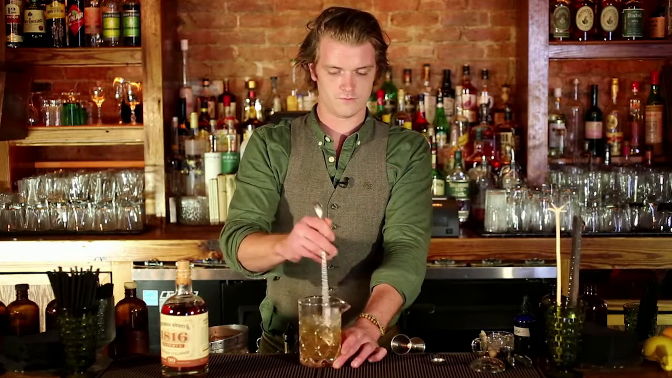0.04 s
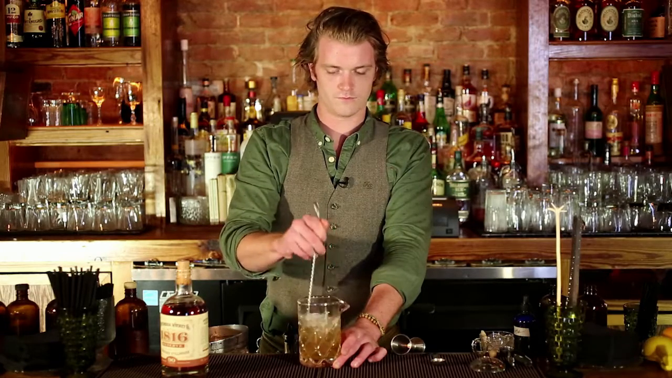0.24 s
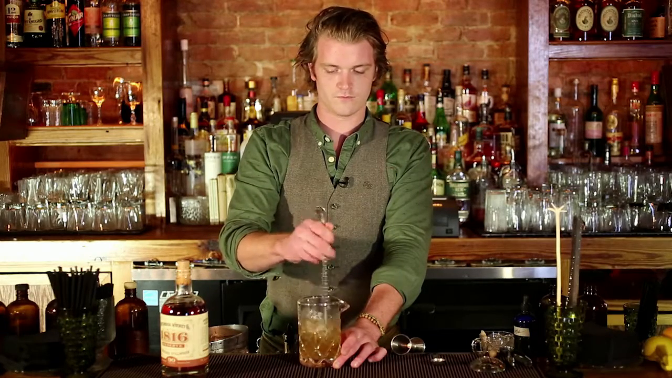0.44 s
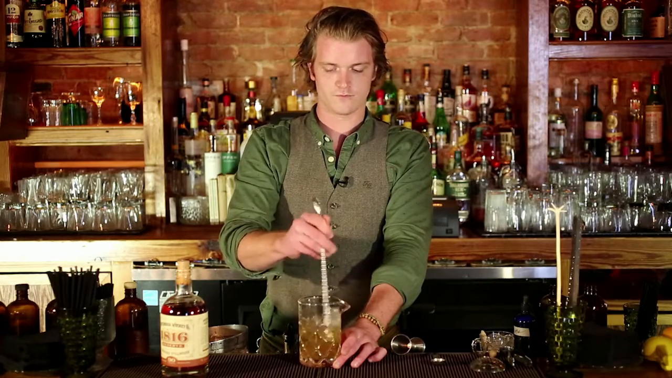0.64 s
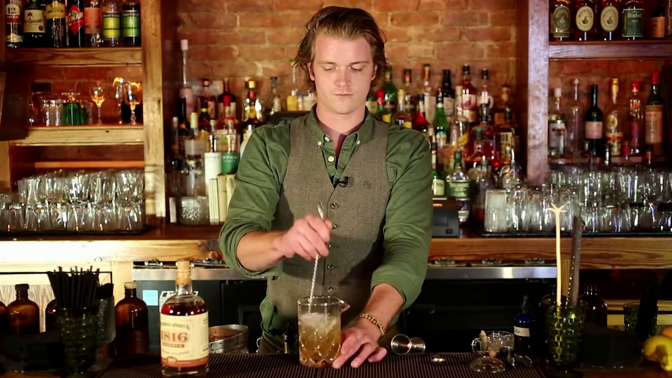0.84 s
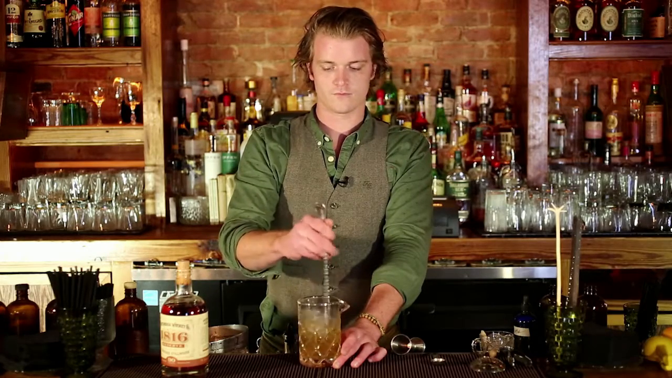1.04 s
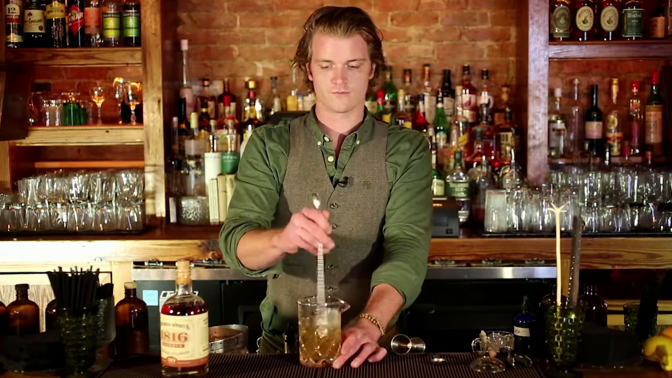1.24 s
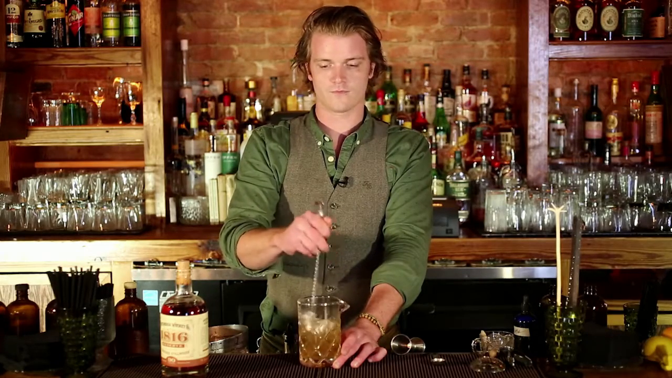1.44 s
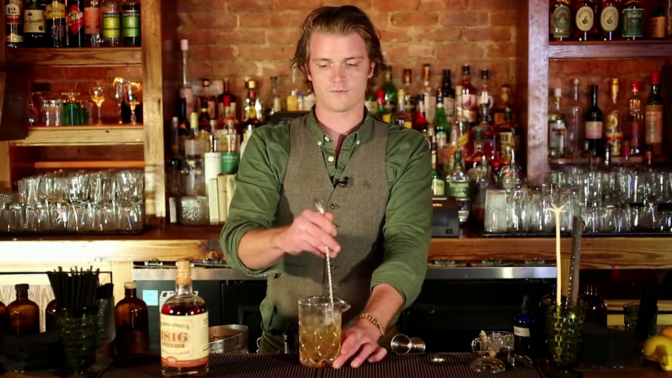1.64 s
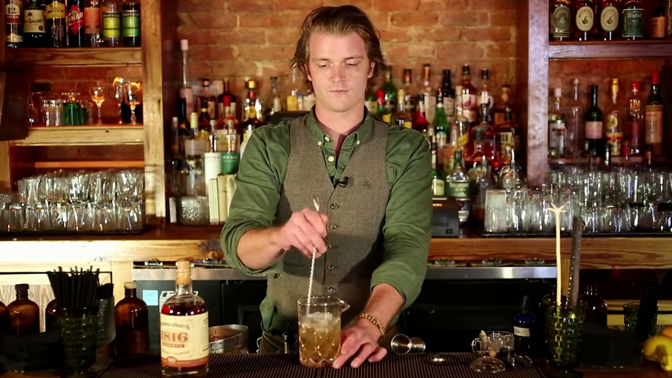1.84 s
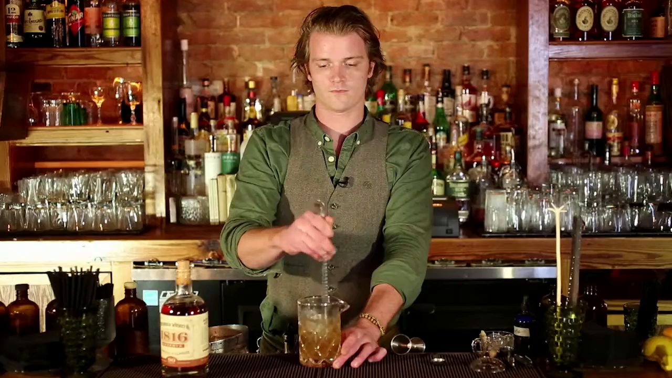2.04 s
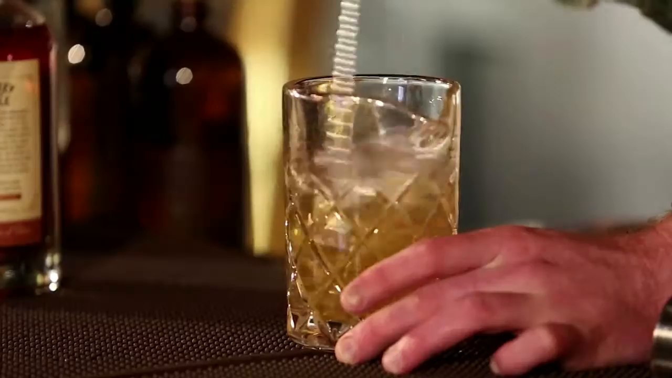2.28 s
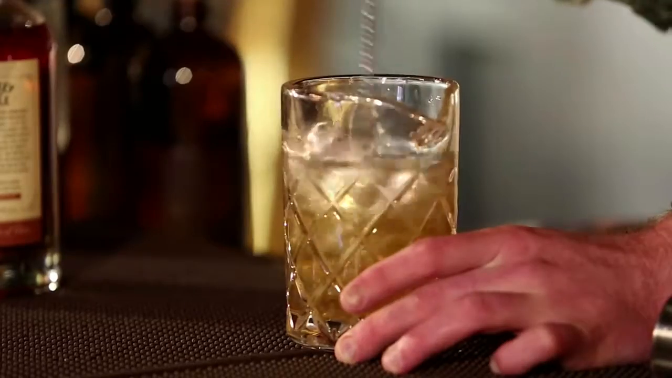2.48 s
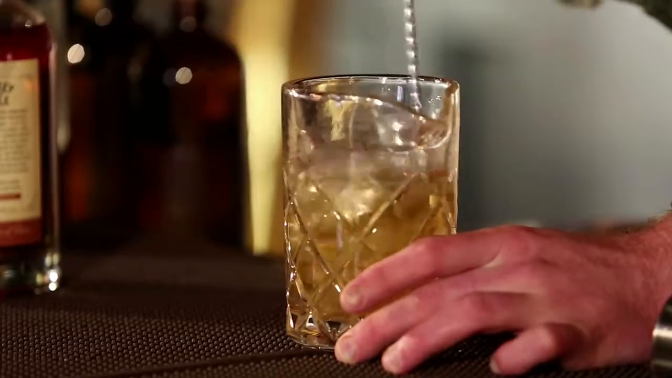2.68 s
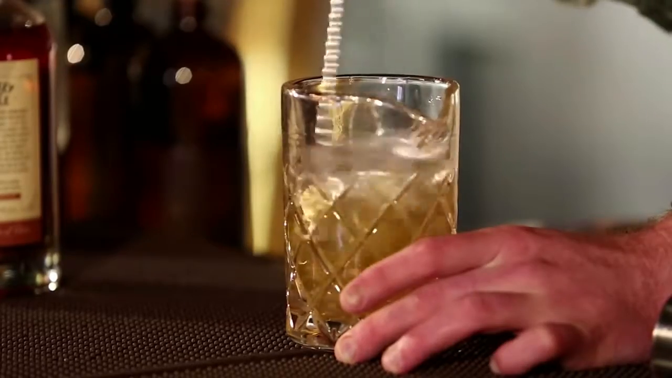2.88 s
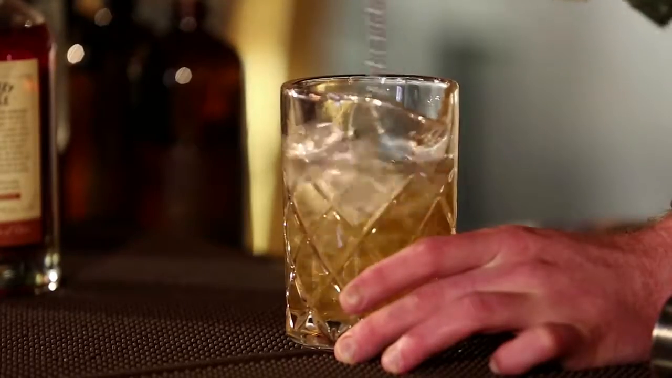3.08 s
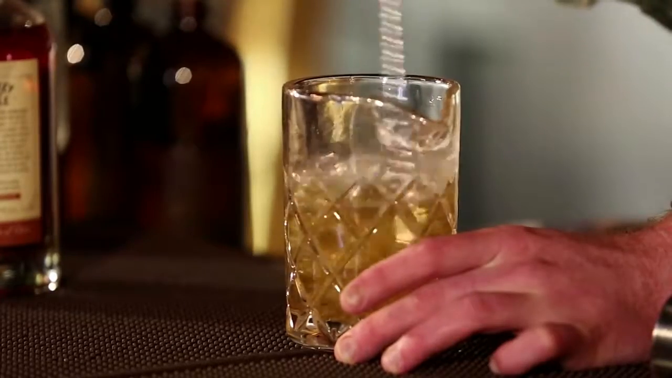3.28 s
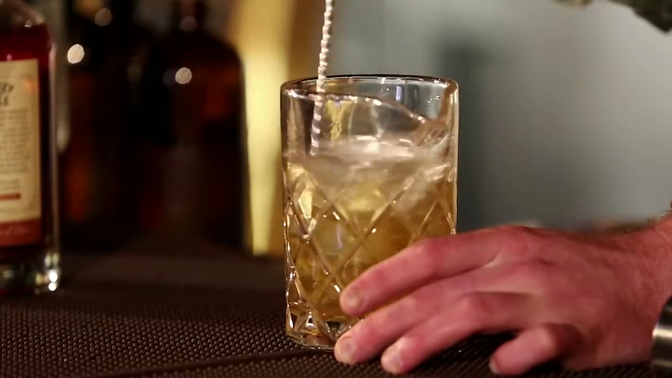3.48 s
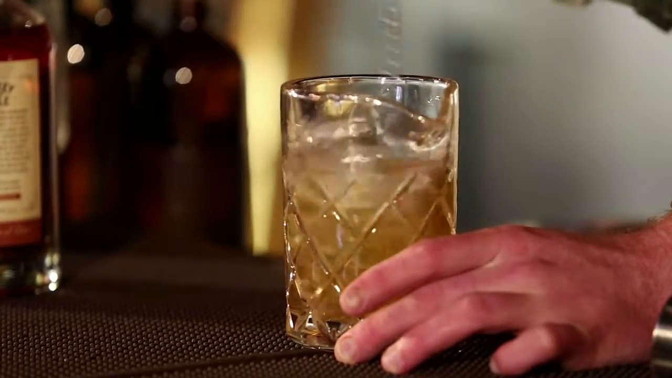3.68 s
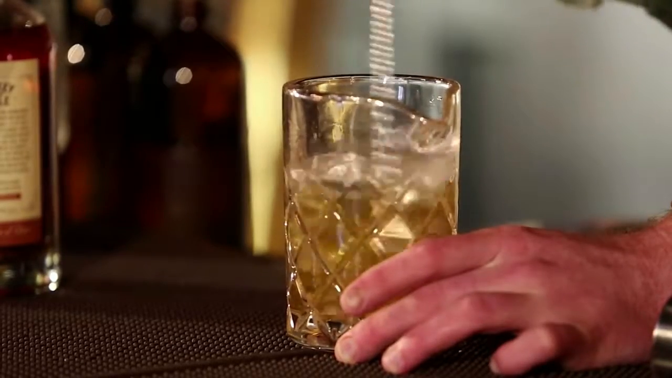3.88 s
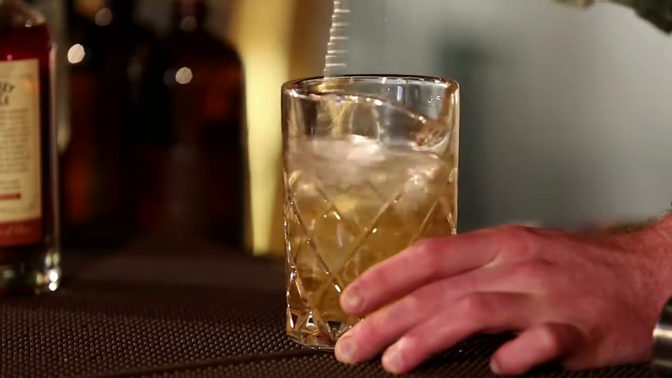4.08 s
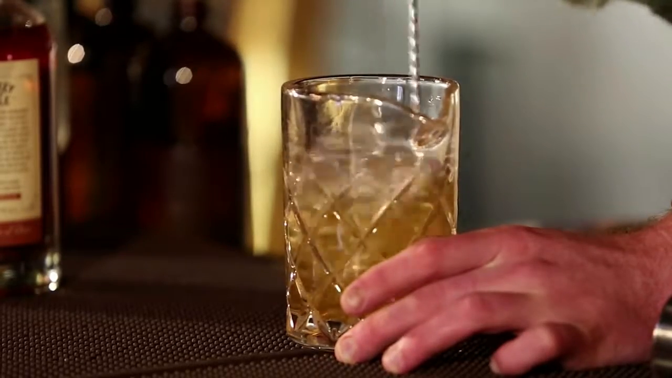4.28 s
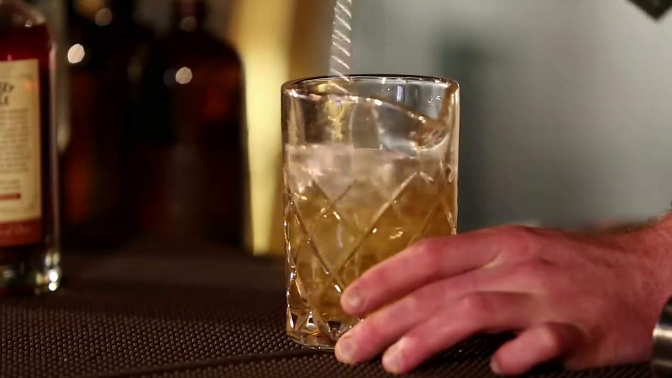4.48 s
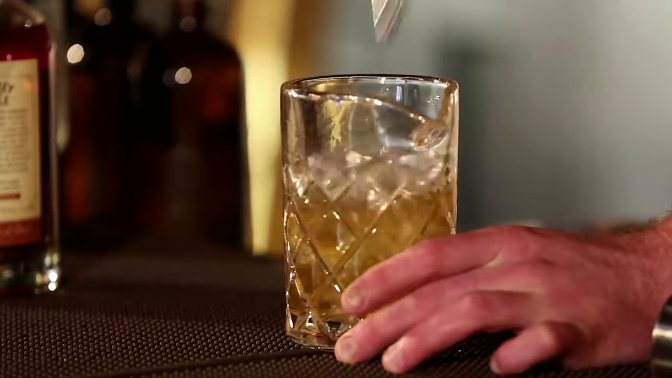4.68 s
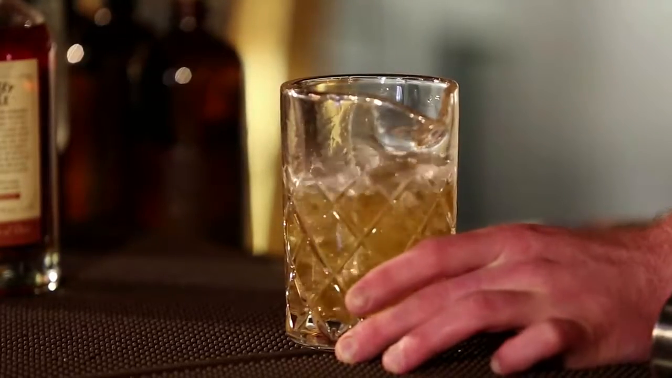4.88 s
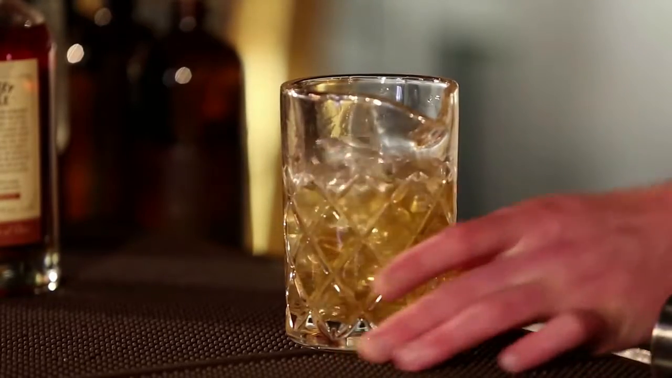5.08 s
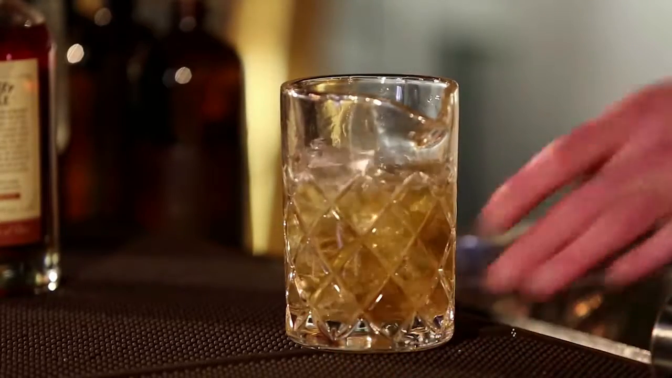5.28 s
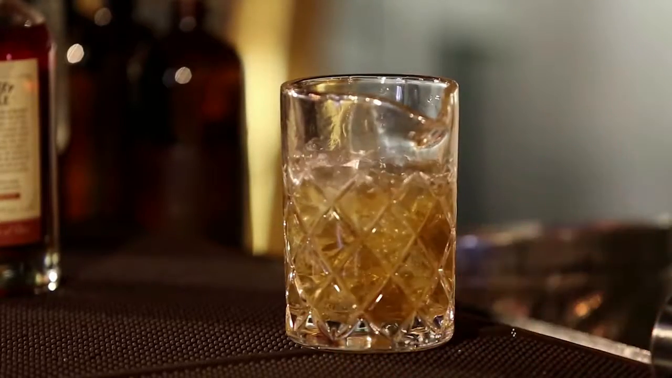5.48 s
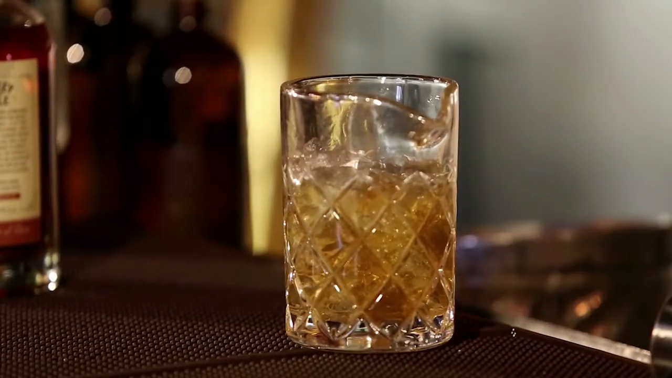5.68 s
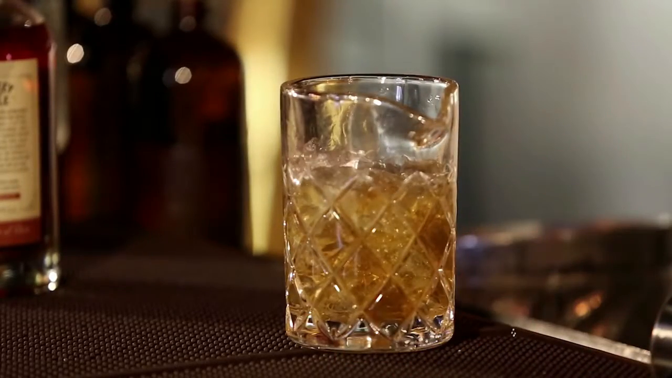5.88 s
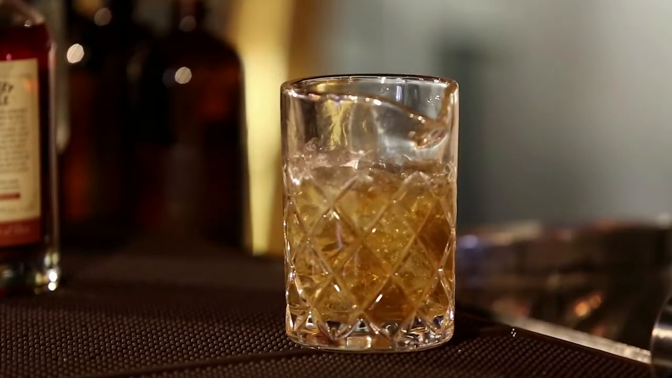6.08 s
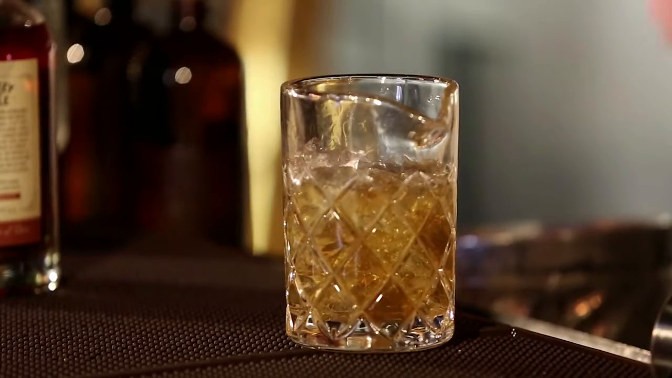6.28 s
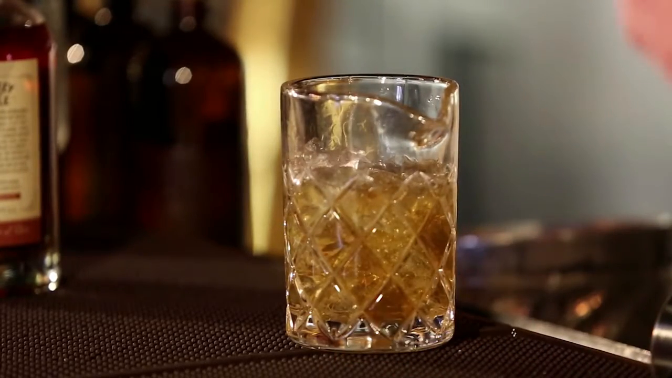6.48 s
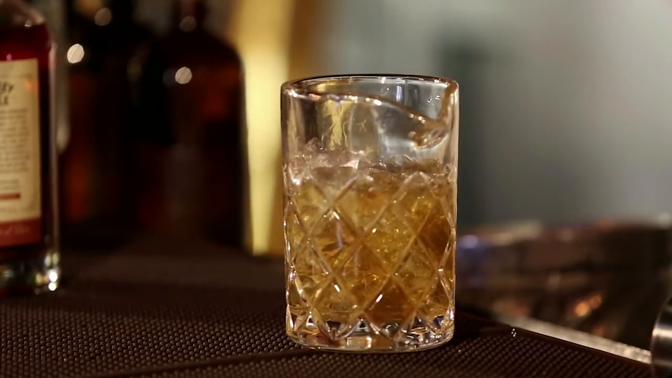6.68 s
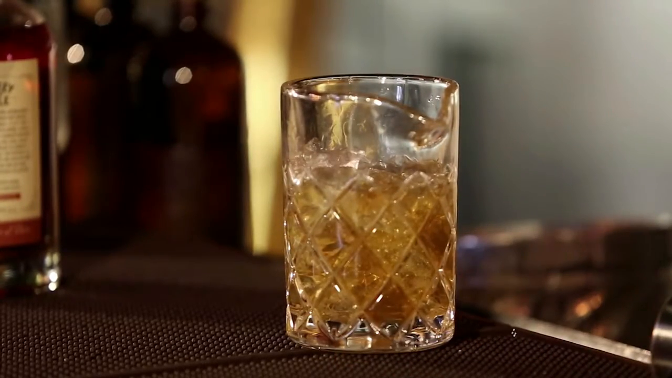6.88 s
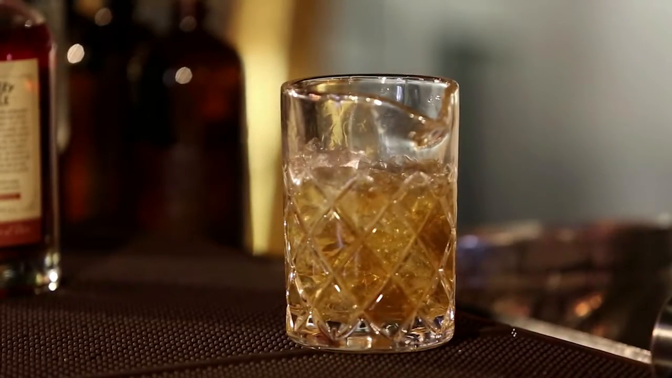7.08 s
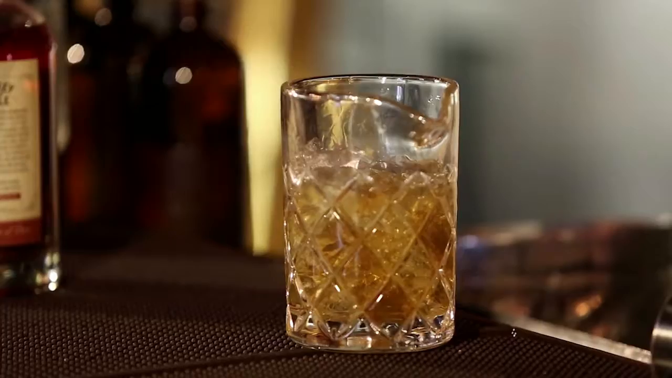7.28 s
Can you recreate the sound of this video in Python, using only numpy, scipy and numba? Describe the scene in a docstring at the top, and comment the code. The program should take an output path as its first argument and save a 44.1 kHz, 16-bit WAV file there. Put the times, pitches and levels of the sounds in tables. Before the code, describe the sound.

Rapid rhythmic stirring: ice cubes tick and grind, the spoon taps the glass wall each turn, and the wavering ring of the filled glass hangs behind. It eases slightly, then gets busier before a final double clink. Stirring stops, leaving low ventilation and fridge hum. Then metal bar tools clatter together with a small thud and fade. Close, centred microphone, short indoor reflections.

```python
"""Stirring ice in a mixing glass

A bar spoon stirs ice round a heavy cut-glass mixing glass, about three turns a second, heard close by.
Ice and spoon contacts are short pitched ticks; the wall is a bank of modes whose pitch wavers with the drink.
The hollow above the drink clucks. The spoon leaves with a last clink; later a steel strainer is picked up
and jangles against a jigger, as sums of decaying modes. A small bar room reflects it all and hums behind.
"""
import sys
import numpy as np
from scipy import signal
from scipy.fft import rfft, irfft
from scipy.io import wavfile
from scipy.ndimage import uniform_filter1d
from numba import njit

SR = 44100
rng = np.random.default_rng(int(sys.argv[2]) if len(sys.argv) > 2 else 0)


def transcribe(signal):
    """Save signal, clipped to [-1, 1], as a 16-bit WAV file at the path in sys.argv[1]."""
    frames = np.atleast_2d(signal).T
    limited = np.clip(frames, -1, 1)
    pcm = np.round(limited * 32767).astype(np.int16)
    wavfile.write(sys.argv[1], SR, pcm)


N = 323250
T = np.arange(N) / SR
TOP_HZ = 16000

# the steel spoon strikes the wall once a turn, then twice more on its way out:
# start_s, strike_db, wall_ring_db, brightness_db_per_octave
STROKES = [(0.0373, -25.5, -62, 5), (0.3386, -26.5, -57, 3.5), (0.6599, -22.5, -59, -3),
           (0.9398, -29.5, -64, 7), (1.2594, -23.5, -53, -4), (1.5824, -23.5, -52, -0.5),
           (1.8976, -26.5, -61, -3), (2.2578, -23, -60, 0), (2.5696, -22, -43, 2.5), (2.8769, -22, -59, 2),
           (3.1797, -26, -51, 2.5), (3.4814, -35, -48, 5), (3.7964, -27.5, -49, -0.5),
           (4.1091, -31.5, -66, 0.5), (4.4702, -45, -51, 16), (4.5336, -25, -63, 2),
           (4.6618, -16, -30.5, -0.5)]
# relative spectrum of small ice contacts: frequency_hz, level_db
GRIT_COLOUR = [(900, -47.5), (1800, -20.5), (2500, 15), (3300, 0.5), (4800, -16), (5350, 5.5), (5850, 11.5),
               (6500, -17.5), (7200, 2), (8000, -26), (9000, -17), (15000, -28)]

SPOON_HZ = 5760  # pitch of the spoon's tick
SURGE_TURN, FAR_SIDE_TURN = 0.079, 0.57  # where in a turn the cubes crowd together
SURGE_WIDTH_TURNS = 0.11


def undb(db):
    """Amplitude ratio: 20 dB is a factor of ten."""
    return 10 ** (np.asarray(db) / 20)


def unit(x):
    """Normalisation: scale to rms 1."""
    return x / np.sqrt(np.mean(x ** 2))


def fade(t, t60):
    """Exponential free decay: 60 dB in t60 seconds."""
    return np.exp(-np.log(1000) * t / max(t60, 1e-4))


def add(track, s, sound):
    """Superposition: mix a sound into a track at time s."""
    i = max(int(s * SR), 0)
    track[i:i + len(sound)] += sound[:max(len(track) - i, 0)]


def colour(x, points, size=2048):
    """Minimum-phase filter through (Hz, dB) points, keeping the power of white noise."""
    hz, db = np.transpose(points)
    bins_hz = np.fft.rfftfreq(size, 1 / SR)
    log_gain = np.log(undb(np.interp(np.log(bins_hz + 1), np.log(hz), db)))
    # folding the cepstrum onto positive time makes the response causal
    cepstrum = irfft(log_gain)
    cepstrum[1:size // 2] *= 2
    cepstrum[size // 2 + 1:] = 0
    response = irfft(np.exp(rfft(cepstrum)))
    return signal.fftconvolve(x, response / np.linalg.norm(response))[:len(x)]


def tilt(x, db_per_octave):
    """Spectral slope that pivots on the spoon's pitch and is level below 2 kHz."""
    hz = np.clip(np.fft.rfftfreq(len(x), 1 / SR), 2000, TOP_HZ)
    return irfft(rfft(x) * undb(db_per_octave * np.log2(hz / SPOON_HZ)), len(x))


def steady(x, span):
    """Running normalisation: hold the rms over span seconds near 1, leaving single ticks standing."""
    k = max(int(span * SR), 2)
    power = np.abs(uniform_filter1d(uniform_filter1d(x ** 2, k), k))
    return x / np.sqrt(power + 1e-4 * np.mean(x ** 2))


def walk(rate):
    """Smoothed random steps, rate per second, of rms near 1."""
    k = int(SR / rate)
    steps = np.repeat(rng.standard_normal(N // k + 1), k)
    return unit(uniform_filter1d(steps, k)[:N])


@njit
def resonate(x, hz, t60):
    """Driven damped oscillator as a rotating phasor, whose pitch may move at every sample."""
    y, z = np.empty(len(x)), 0j
    keep = np.exp(-np.log(1000.) / (t60 * SR))
    for i in range(len(x)):
        turn = 2 * np.pi * hz[i] / SR
        z = z * keep * complex(np.cos(turn), np.sin(turn)) + x[i] + 1e-18
        y[i] = z.imag
    return y


def tick(hz, cycles, size=1500):
    """Heavily damped oscillation: a few cycles that swell and die, the envelope peaking at 1."""
    age = np.arange(size) / SR * hz
    rise = age / max(cycles, .2)
    return rise * np.exp(1 - rise) * np.sin(2 * np.pi * age)


def burst(t60, rise=0.00061, size=8000):
    """Many tiny contacts merge into noise that swells over rise seconds and dies."""
    t = np.arange(size) / SR
    return rng.standard_normal(size) * fade(t, t60) * (1 - np.exp(-t / rise))


def shimmer(t60, count, stagger_s=.001, size=2400):
    """Inharmonic partials, drawn anew for every contact, set in one after another and decay."""
    hz = (np.arange(count) + rng.random(count))[:, None] * TOP_HZ / count
    onset = stagger_s * rng.exponential(size=(count, 1))
    age = np.maximum(np.arange(size) / SR - onset, 0)
    return np.sqrt(2 / count) * np.sum(np.sin(2 * np.pi * hz * age) * fade(age, t60), axis=0)


def surge(centre):
    """Periodic forcing: a swell to 1 and back at one place in every turn of the spoon."""
    turns = np.interp(T, np.transpose(STROKES)[0], np.arange(len(STROKES)))
    away = (turns - centre + .5) % 1 - .5
    swell = np.exp(-.5 * (away / SURGE_WIDTH_TURNS) ** 2)
    return swell * fade(np.maximum(T - STROKES[-1][0], 0), 0.17)


def wall(push, hold, tilt_db, waver=0.0098, waver_rate=40):
    """Modal ringing: sloshing drink bends each mode; cubes leaning on the wall (hold < 1) shorten it."""
    # modes of the filled glass wall, before hold and tilt: frequency_hz, level_db, t60_s
    wall_modes = [(2128, -6.5, 1), (2110, 1.5, 0.47), (2160, -4.5, 0.24), (2537, -17, 0.66),
                  (5280, -11.5, 0.48), (5320, -11, .6), (5440, -11, 0.38), (6730, -20, 0.22),
                  (9500, -35, 0.047)]
    # drift of the wall's pitch as the liquid load changes: time_s, pitch_ratio
    pitch_drift = [(0, 1.007), (1.0, 1.013), (2.0, 1.014), (3.5, 1.012), (4.25, 1.005), (4.5, 1.022),
                   (5.0, 1.06)]
    load = np.interp(T, *np.transpose(pitch_drift))
    swirl = np.interp(T, [4.3, 4.7], [1, .8])
    out = 0
    for hz, db, t60 in wall_modes:
        pitch = hz * load * (1 + waver * swirl * walk(waver_rate))
        level = undb(db + tilt_db * np.log2(hz / wall_modes[0][0]))  # tilt in dB per octave
        out = out + level * resonate(push, pitch, float(max(t60 * hold, .01)))
    return out


def splinters(db=-3, hz=8000, delay_s=.022, t60=0.067, count=12):
    """Random impulse shower: a ragged spray of small ticks as the cubes settle after a blow."""
    out = np.zeros(SR // 8)
    delays = delay_s * rng.exponential(size=count)
    for s, (a, b) in zip(delays, rng.standard_normal((count, 2))):
        level = undb(db + 2.2 * a) * fade(s, t60)
        add(out, s, level * tick(min(hz * np.exp(.27 * b), TOP_HZ), 2.2, size=300))
    return out


def contact(hz, cycles, crack_db, softness, crack_t60=0.013):
    """Impact of hard bodies: a tick, a second, higher one (a cube is never square), crack and splinters."""
    # relative spectrum of a hard contact: frequency_hz, level_db
    crack_colour = [(100, -21.5), (500, -10), (800, -10.5), (1800, -15), (3000, 19), (5700, 3), (6500, 4),
                    (7300, 10.5), (8000, -8.5), (9000, 10), (10300, -4), (11200, -5), (14000, -8.5),
                    (16000, -11.5)]
    out = undb(crack_db) * splinters()
    crack = shimmer(crack_t60, count=36)
    # adding the neighbouring sample dulls the crack; a negative softness sharpens it
    add(out, 0, undb(crack_db) * colour(crack + softness * np.roll(crack, 1), crack_colour))
    add(out, 0, tick(hz, cycles) + 0.38 * tick(hz * rng.uniform(1.1, 1.2), 1.0))
    return out


def rattle(spread_db=4, ice_hz=3550, pitch_spread=0.242, cycles=2.1, cluster_s=.008, grit_db=-6,
           chip_db=-67, chip_growth=1.9, chip_scatter_db=1.5, chip_hz=8000,
           hollow_hz=1350, cluck_scatter_db=3.0, air_db=-9, air_hz=1410, air_t60=0.14,
           ring_db=-43.5, ring_follow=0.62, count=3000):
    """Random collisions, surging twice a turn: cubes tick, grind, nudge the wall and may cluck in the hollow."""
    # vigour of the stirring; far_side_db is extra jostling as the spoon crosses the far side:
    # time_s, ice_db, hollow_db, far_side_db
    vigour = [(0.0, -47.5, -48, 3.5), (0.999, -48.5, -48.5, 0), (1.45, -50.5, -50, 5.5),
              (1.85, -55, -53, 3.5), (2.15, -57.5, -49, 11), (2.45, -47, -46, 9.5),
              (2.949, -48, -48.5, 8.5), (3.4, -45.5, -43.5, 4), (4.02, -48, -45, 11.5),
              (4.249, -45.5, -47, -2.5), (4.668, -52.5, -51, 10.5), (4.78, -63.5, -62.5, 1.5),
              (4.95, -67.5, -67.5, 0)]
    # relative spectrum of the hollow above the drink: frequency_hz, level_db
    hollow_colour = [(300, -46.5), (550, -21), (750, -53), (950, -3), (1150, -3.5), (1420, 2), (1560, 0),
                     (1750, -45.5), (2400, -32.5)]
    surge_db = 3.5  # the cubes crowd together at each stroke
    times, *controls = np.transpose(vigour)
    ice_db, hollow_db, far_db = (np.interp(T, times, c, right=-120) for c in controls)
    ice_db = ice_db + surge_db * surge(SURGE_TURN) + far_db * surge(FAR_SIDE_TURN)
    effort_db = np.maximum(ice_db - np.median(ice_db[T < times[-1]]), -22)

    ticks, clucks, grinds, chips, pushes = np.zeros((5, N))
    # each shove sets off a cluster of four contacts
    shoves = count // 4
    shove_times = np.repeat(rng.uniform(0, times[-1], shoves), count // shoves)
    when = shove_times + cluster_s * rng.exponential(size=count)
    force = np.minimum(rng.exponential(size=shoves), 3)
    sizes = undb(spread_db * np.repeat(force, count // shoves))
    for t, size, (a, b, c, d, e) in zip(when, sizes, rng.standard_normal((count, 5))):
        pitch = ice_hz * np.exp(pitch_spread * min(b, 2))
        add(ticks, t, size * tick(pitch, cycles * np.exp(.35 * a), size=500))
        add(grinds, t, size * burst(0.0036, size=500))
        chip = tick(min(chip_hz * np.exp(.22 * a), TOP_HZ), 3.0, size=200)
        add(chips, t, size * undb(chip_scatter_db * e) * chip)
        # only some contacts meet the wall squarely, so its ring comes in separate strikes
        add(pushes, t, np.array([np.sqrt(size) * d ** 3]))
        if c > 1.1:
            cluck = tick(hollow_hz * np.exp(0.098 * d), 1.6, size=700)
            add(clucks, t, np.sqrt(size) * undb(cluck_scatter_db * c) * cluck)

    ice = unit(ticks) + undb(grit_db) * unit(colour(grinds, GRIT_COLOUR))
    ice = steady(ice, 0.15) * undb(ice_db)
    # harder jostling chips the edges, so the top end grows faster than the rest
    chips = steady(chips, 0.059) * undb(chip_db + chip_growth * effort_db)
    # the air above the drink rings on between clucks, its pitch moving with the surface
    nudges = colour(pushes, hollow_colour)
    air = resonate(nudges, air_hz * (1 + .03 * walk(7)), float(air_t60))
    hollow = unit(colour(clucks, hollow_colour)) + undb(-7.5) * unit(nudges) + undb(air_db) * unit(air)
    hollow = steady(hollow, 0.2) * undb(hollow_db - 0.5)
    ring = steady(wall(pushes, hold=0.37, tilt_db=-3, waver=.011, waver_rate=60), 0.12)
    # once the spoon is out the cubes stop driving the wall
    leaving_db = 60 * np.maximum(T - 4.5, 0)
    return ice + chips + hollow + ring * undb(ring_db + ring_follow * effort_db - leaving_db)


def spoon(tick_db=-2, cycles=5, crack_db=1, graze_db=-40, lead=0.003, cluck_db=-21, hollow_hz=1350,
          hold=0.54, ring_db=-1):
    """Impulsive excitation: the spoon grazes ice, cracks on the wall, rings it; all but two strokes rebound."""
    bounce_s, bounce_db = .018, -19.5
    hits, grazes, pushes = np.zeros((3, N))
    for s, db, wall_db, bright_db in STROKES:
        add(grazes, s - lead, undb(graze_db) * burst(0.22, rise=0.00067))
        pitch = SPOON_HZ * np.exp(0.014 * rng.standard_normal())
        strike = contact(pitch, cycles, crack_db, softness=-0.41, crack_t60=0.017)
        add(hits, s, undb(db + tick_db) * tilt(strike, bright_db))
        add(hits, s, undb(db + cluck_db) * tick(hollow_hz, 0.73))
        add(pushes, s, undb([wall_db + ring_db]))
    for s, db, _, bright_db in STROKES[:-2]:
        rebound = contact(SPOON_HZ, cycles, crack_db=-11, softness=-0.21)
        add(hits, s + bounce_s, undb(db + bounce_db) * tilt(rebound, bright_db))
    ring = wall(pushes, hold=hold, tilt_db=7.0, waver=.015, waver_rate=90)
    return hits + colour(grazes, GRIT_COLOUR) + ring


def clinks_and_bumps(cycles=2.83, ring_db=-21, hollow_db=-20, hollow_hz=1350, bump_hz=2700, bump_tick_db=2,
          bump_ring_db=-16):
    """Impact hardness: a clink is mostly tick and crack, a bump a cluck and tick; force scales the wall's ring."""
    # clinks against the glass, mostly cubes, some from the spoon; crack_db is relative to level_db: start_s,
    # level_db, pitch_hz, crack_db
    clinks = [(0.1258, -27, 3440, -21), (0.191, -33, 3630, -34), (0.2433, -26, 3674, -17),
              (0.3712, -22.5, 5580, -11.5), (0.505, -33, 5200, -26), (0.6355, -29, 3400, -9),
              (0.7078, -29, 2583, -29), (0.7995, -31, 4460, -19), (0.9582, -22.5, 5550, -7.5),
              (1.0241, -27.5, 3574, -26), (1.0969, -29, 5320, -35), (1.1114, -30, 4200, -43),
              (1.444, -32, 4900, -20), (1.2431, -15, 3270, -13.5), (1.2605, -29, 2900, -14),
              (1.573, -17.5, 3420, -17), (1.5914, -18.5, 3230, -10), (2.246, -24.5, 3060, -14),
              (2.2715, -23.5, 2620, -10), (2.5481, -25, 3300, -14), (2.8505, -23, 3270, -10.5),
              (3.1028, -32.5, 4130, -24), (3.1804, -20, 3260, -23), (3.1905, -23, 3540, -7),
              (3.3023, -22.5, 3360, -18), (3.3203, -30, 3420, -28), (3.3412, -23, 3280, -24),
              (3.3603, -22, 3440, -11), (3.3822, -21.5, 4130, -12), (3.4338, -28.5, 4160, -40),
              (3.4998, -19.5, 3520, -15), (3.6468, -29, 2940, -28), (3.697, -21.5, 2790, -19),
              (3.7815, -22, 3120, -24), (3.9591, -31.5, 2770, -23), (4.0268, -27, 3360, -4.5),
              (4.134, -27, 2470, -6), (4.3256, -27, 3570, -15.5), (4.5096, -30.5, 3600, -23),
              (4.5965, -22, 3920, -13.5), (4.5986, -19, 2670, -14.5), (4.6618, -15.5, 2300, -31),
              (4.744, -36.5, 2640, -24)]
    # cubes bump softly together and sound the hollow above the drink: start_s, level_db
    bumps = [(0.242, -32), (0.7078, -33.5), (0.7664, -30), (1.6452, -31), (1.726, -34), (1.8293, -33.5),
             (2.0554, -34), (2.4501, -29.5), (3.573, -28), (4.7074, -40.5)]
    hits, pushes = np.zeros((2, N))
    for s, db, hz, crack_db in clinks:
        add(hits, s, undb(db) * contact(hz, cycles, crack_db, softness=0.34))
        add(hits, s, undb(db + hollow_db) * tick(hollow_hz, 1.5))
        add(pushes, s, undb([db + ring_db]))
    for s, db in bumps:
        cluck = tick(hollow_hz * np.exp(0.049 * rng.standard_normal()), 3.34)
        knock = tick(bump_hz * np.exp(0.023 * rng.standard_normal()), cycles)
        add(hits, s, undb(db) * (cluck + undb(bump_tick_db) * knock))
        add(pushes, s, undb([db + bump_ring_db]))
    return hits + wall(pushes, hold=0.44, tilt_db=4)


def thumps(db=-39, pitch_hz=46, knock_db=-5, knock_hz=560, base_db=-16, base_hz=850):
    """Structure-borne sound: strokes also knock the heavy base of the glass and shake the bar top."""
    out = np.zeros(N)
    for s, strike_db, wall_db, _ in STROKES:
        add(out, s, undb(wall_db + knock_db) * tick(knock_hz, 0.57))
        add(out, s, undb(strike_db + base_db) * tick(base_hz, 0.31))
        shake_hz = pitch_hz * np.exp(.3 * rng.standard_normal())
        add(out, s, undb(strike_db + db) * tick(shake_hz, 0.1, size=6000))
    return out


def slosh(pitch_hz=533, db=-60, swing=0.086, pitch_spread=.08, spread_db=0.5, cycles=4.1, count=130):
    """Periodic pitch modulation: the drink laps in soft blips whose pitch rises and falls with each turn."""
    out = np.zeros(N)
    crest = surge(SURGE_TURN)
    when = rng.uniform(0, STROKES[-1][0], count)
    for s, (a, b) in zip(when, rng.standard_normal((count, 2))):
        hz = pitch_hz * np.exp(swing * crest[int(s * SR)] + pitch_spread * a)
        add(out, s, undb(db + spread_db * b) * tick(hz, cycles, size=3000))
    return out


def gulps():
    """Cavity resonance: pockets of air ring and glide in pitch as the drink closes over them."""
    # air pockets closing behind the spoon; each sounds for up to twice scale_s, gliding past end_hz:
    # start_s, start_hz, end_hz, scale_s, level_db
    pockets = [(3.098, 984, 800, 0.028, -47), (4.166, 896, 1404, 0.019, -27.5),
               (4.451, 1710, 1900, .03, -44.5), (5.191, 2610, 2940, 0.0071, -41.5)]
    out = np.zeros(N)
    for s, start_hz, end_hz, length, db in pockets:
        age = np.arange(int(2 * length * SR)) / (length * SR)
        hz = start_hz * (end_hz / start_hz) ** (age ** 2)
        envelope = np.sqrt(age) * np.exp(1 - age ** 6)
        add(out, s, undb(db) * envelope * np.sin(2 * np.pi * np.cumsum(hz) / SR) / 2)
    return out


def struck(modes, rise=.0012, scatter_db=2.0, detune=.0018, size=26000):
    """Modal synthesis of one blow on thin steel; each blow shares its force differently among the modes."""
    t = np.arange(size) / SR
    chance = rng.standard_normal((len(modes), 3))
    ring = 0
    for (hz, db, t60), (a, b, phase) in zip(modes, chance):
        partial = np.sin(2 * np.pi * (hz * (1 + detune * b) * t + phase))
        ring = ring + undb(db + scatter_db * a) * fade(t, t60) * partial
    return ring * (1 - np.exp(-t / rise))


def steel_tool(thud_t60=0.042):
    """Modal and stick-slip sound: the strainer clips the jigger, thuds on the bar, chatters; its spring rings."""
    # steel tools knock together: start_s, jigger_ring_db, strainer_ring_db, scrape_db, scrape_t60_s,
    # thud_db, brightness_db_per_octave (not applied to the thud)
    jangles = [(6.183, -21.5, -58, -30.5, 0.051, -37.5, 0.5), (6.212, -27, -46, -23.5, 0.056, -27, 2),
               (6.216, -20, -51, -36.5, 0.37, -61, 1.5), (6.349, -34.5, -56, -44.5, 0.086, -75, -2.5),
               (6.468, -36, -41.5, -31, 0.11, -58, 0), (6.547, -42.5, -54.5, -43, 0.067, -74, -3.5),
               (6.597, -63, -65, -54.5, 0.054, -78, -9.5)]
    # modes of the jigger: frequency_hz, level_db, t60_s
    jigger_modes = [(2712, -17, .47), (5318, -25, .2), (6080, -17, .1), (6476, -15, .12), (6600, 0, .09),
                    (6694, -6, .1), (7194, -18, .08), (7675, -28, .55), (10271, -9, .09), (10607, -21, .24),
                    (11754, -17, .15), (12882, -10, .11), (13482, -20, .2), (13850, -14, .15),
                    (14058, -14, .2), (14726, -14, .06), (15580, -16, .14), (15715, -18, .22)]
    # modes of the strainer: frequency_hz, level_db, t60_s
    strainer_modes = [(2724, 0, .38), (4861, 2, .12), (5017, 1, .14), (5765, -1, .25), (6575, 0, .2),
                      (6838, 4, .3), (8686, -7, .45), (9066, 3, .24), (10462, -8, .2), (10715, -3, .16),
                      (11733, 2, .24), (12054, -2, .26), (13084, 1, .22), (15027, -8, .25)]
    # relative spectrum of steel scraping: frequency_hz, level_db
    scrape_colour = [(300, -5), (1800, -21.5), (2500, 6), (3600, -4.5), (4300, -7.5), (5000, 2), (6700, 3),
                     (8000, -9), (10400, -4), (11100, -2), (13000, 0.5), (16000, -12)]
    # relative spectrum of the thud on the bar: frequency_hz, level_db
    thud_colour = [(25, 3.5), (70, -6), (160, -14.5), (330, 1), (450, -7.5), (700, 6), (1200, -1),
                   (2000, -8.5), (5000, -21)]
    grip_s = 6.605  # the hand closes on the strainer and stills it
    rings, scrapes, thuds = np.zeros((3, N))
    for s, jigger_db, strainer_db, scrape_db, scrape_t60, thud_db, bright_db in jangles:
        ring = undb(jigger_db) * struck(jigger_modes) + undb(strainer_db) * struck(strainer_modes)
        add(rings, s, tilt(ring, bright_db))
        spring = shimmer(.06, count=64)
        chatter = burst(scrape_t60, rise=0.015 * scrape_t60)
        # about one sample in twenty is a contact; the gain restores the power
        chatter = chatter * (rng.random(len(chatter)) < 1 / 20) * np.sqrt(20)
        scrape = signal.fftconvolve(chatter, spring / np.linalg.norm(spring))
        add(scrapes, s, tilt(undb(scrape_db) * scrape, bright_db))
        add(thuds, s, undb(thud_db) * burst(thud_t60))
    rings = rings * fade(np.maximum(T - grip_s, 0), .18)
    return rings + colour(scrapes, scrape_colour) + colour(thuds, thud_colour)


def room(x, wet_db=-11, low_t60=0.27, high_t60=0.2, split_hz=4500, near_db=-11, near_t60=0.015, size=24000):
    """Reverberation: quick reflections from bar top and shelves, then a tail whose treble dies first."""
    t = np.arange(size) / SR
    noise, near = rng.standard_normal((2, size))
    split = min(split_hz, SR / 3)
    low = signal.sosfilt(signal.butter(2, split, fs=SR, output="sos"), noise)
    high = signal.sosfilt(signal.butter(2, split, "high", fs=SR, output="sos"), noise[::-1])
    tail = (low * fade(t, low_t60) + high * fade(t, high_t60)) * (t > .007)
    near = near * fade(t, near_t60) * (t > .001)
    response = undb(wet_db) * tail / np.linalg.norm(tail) + undb(near_db) * near / np.linalg.norm(near)
    return x + signal.fftconvolve(x, response)[:N]


def background():
    """Broadband and tonal noise: ventilation, and the slightly wavering hum of the fridges."""
    # relative spectrum of the room's ventilation: frequency_hz, density_db_per_hz
    air_colour = [(15, -33), (25, -16), (161, 0), (263, -8.5), (301, -1.5), (451, -6), (677, -14),
                  (962, -13.5), (1560, -19), (3520, -26.5), (16000, -31.5)]
    # the fridges' hum: frequency_hz, rms_level_db
    hum_tones = [(118, -72.5), (162, -72), (303, -72)]
    air_db = -60
    air = unit(colour(rng.standard_normal(N), air_colour)) * undb(air_db + 0.79 * walk(13))
    hum = 0
    for hz, db in hum_tones:
        phase = 2 * np.pi * np.cumsum(hz * (1 + .012 * walk(11))) / SR
        hum = hum + undb(db) * np.sqrt(2) * np.sin(phase)
    return air + hum


def scene(side_db=-19, air_side_db=-25):
    """Mid-side stereo: the glass stands dead centre; left and right differ only faintly, by a thin haze in the
    treble and in the background."""
    dry = rattle() + spoon() + clinks_and_bumps() + thumps() + slosh() + gulps() + steel_tool()
    mid = room(dry) + background()
    treble = np.diff(dry, prepend=0)
    reflections = room(treble) - treble
    side = undb(side_db) * reflections + undb(air_side_db) * background()
    return np.array([mid + side, mid - side])


def record(dry):
    """Band limiting: the recorder cuts the top with a steep low-pass."""
    return signal.sosfilt(signal.ellip(10, .2, 80, TOP_HZ, fs=SR, output="sos"), dry)


dry = scene()
out = record(dry)
transcribe(out)
```